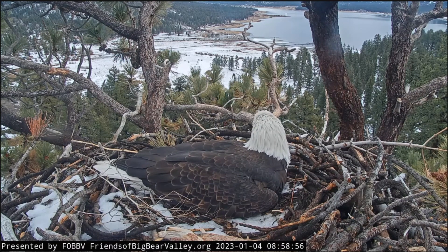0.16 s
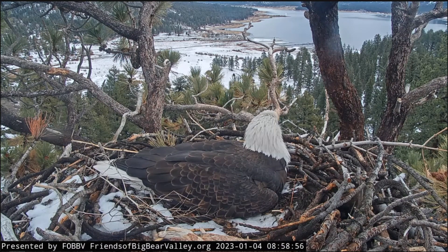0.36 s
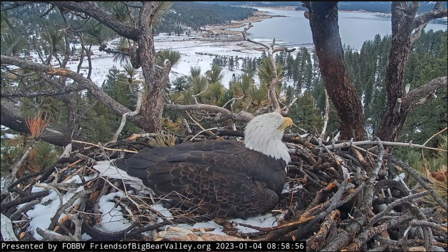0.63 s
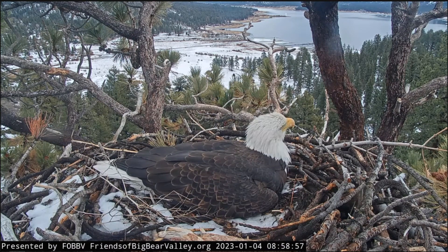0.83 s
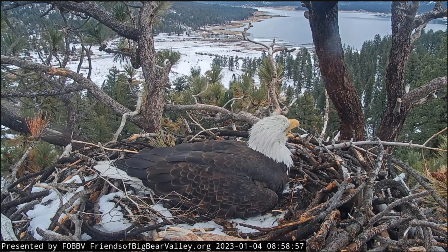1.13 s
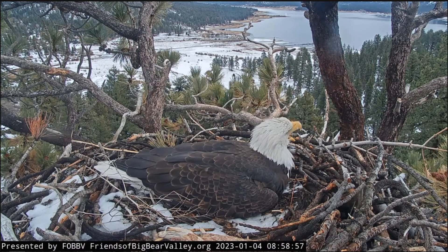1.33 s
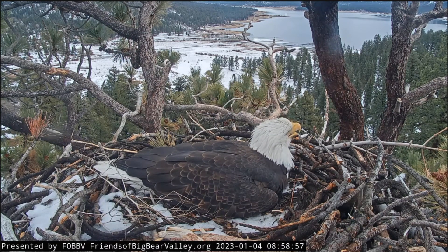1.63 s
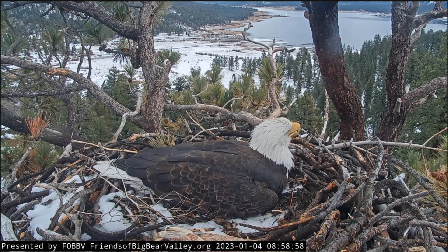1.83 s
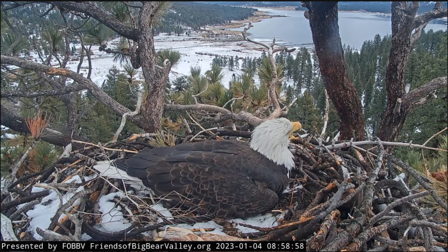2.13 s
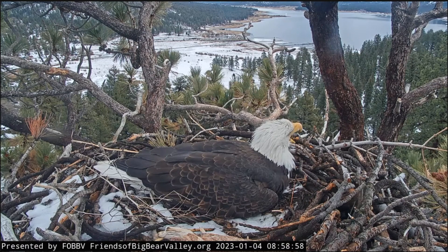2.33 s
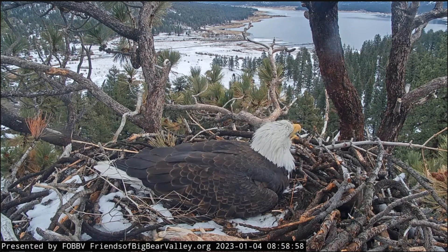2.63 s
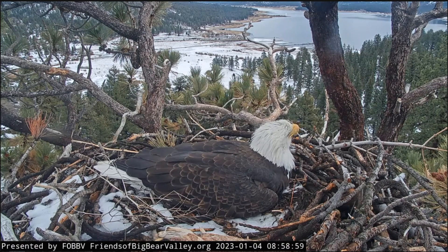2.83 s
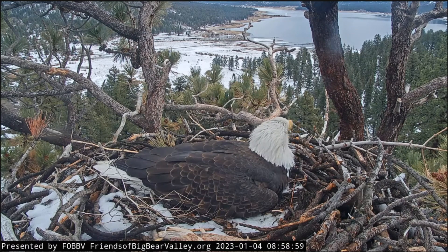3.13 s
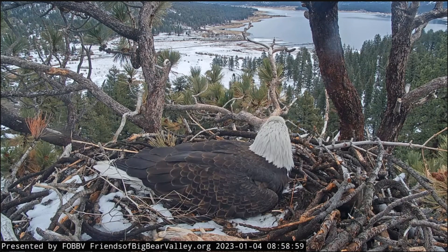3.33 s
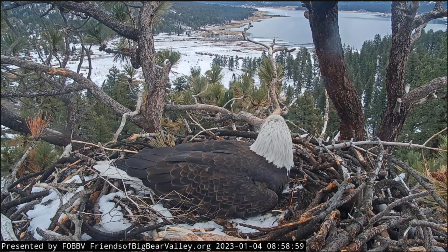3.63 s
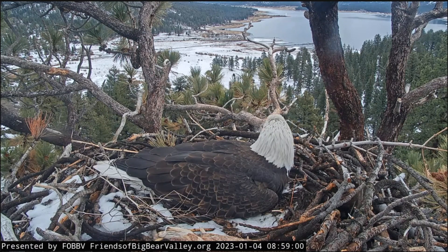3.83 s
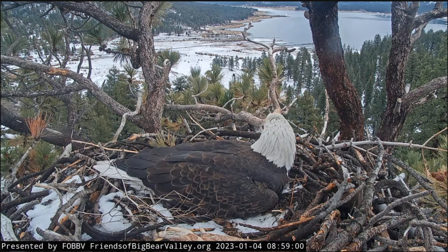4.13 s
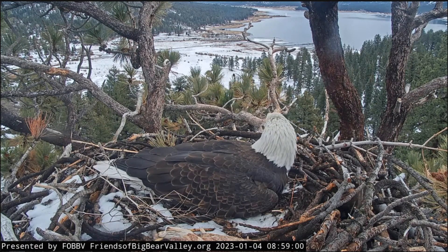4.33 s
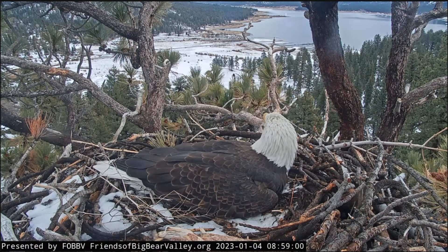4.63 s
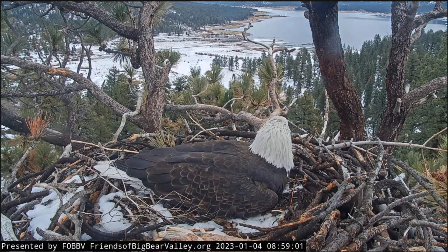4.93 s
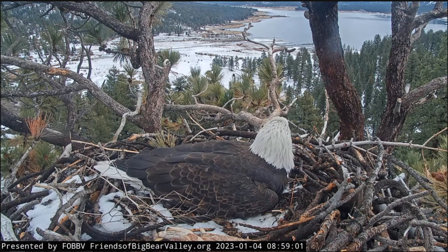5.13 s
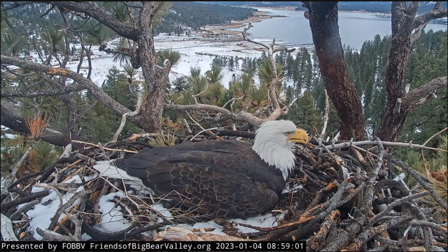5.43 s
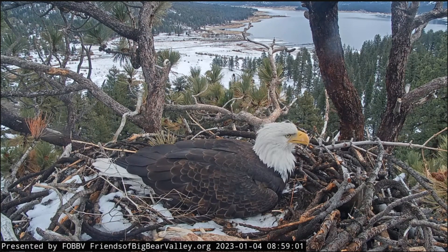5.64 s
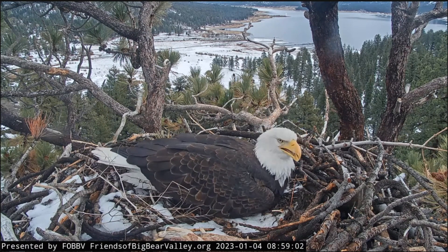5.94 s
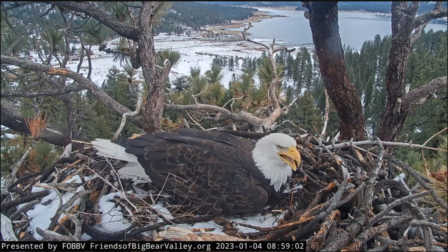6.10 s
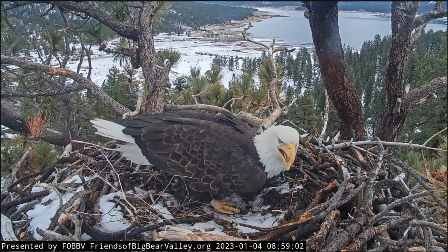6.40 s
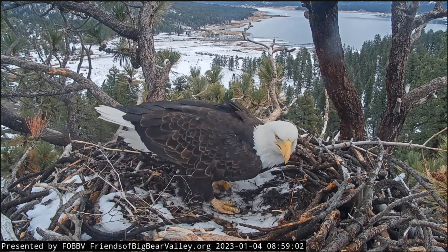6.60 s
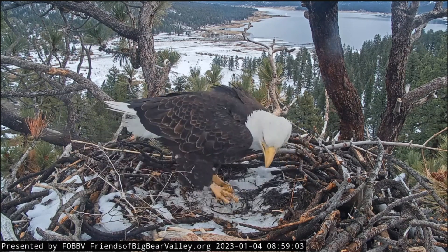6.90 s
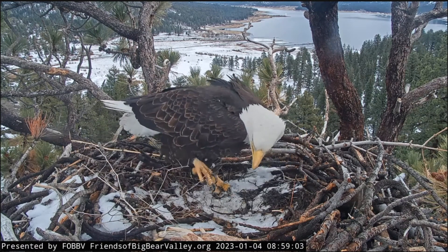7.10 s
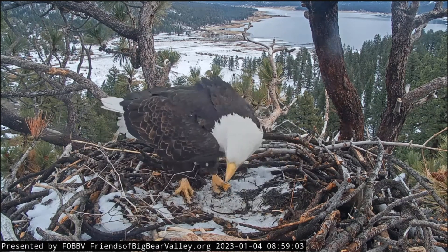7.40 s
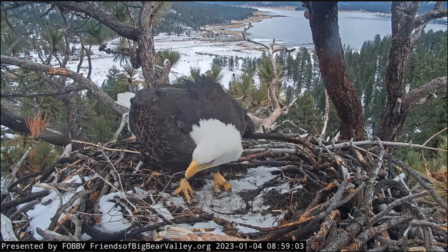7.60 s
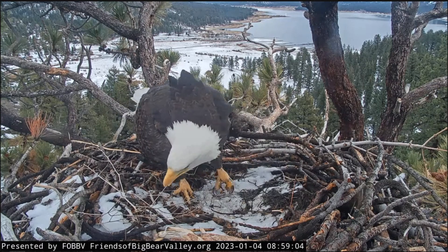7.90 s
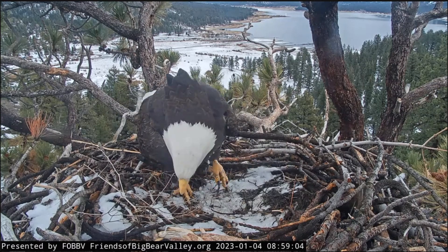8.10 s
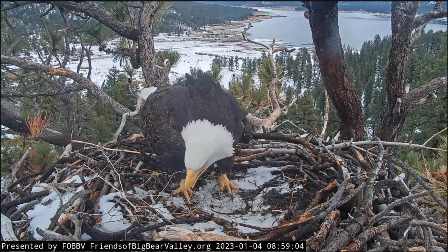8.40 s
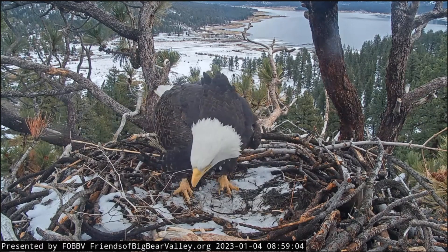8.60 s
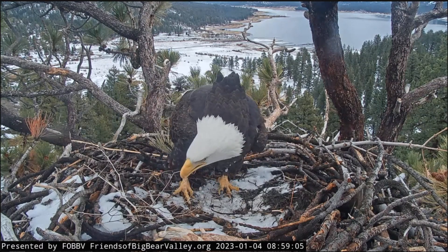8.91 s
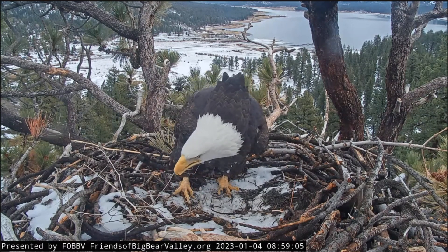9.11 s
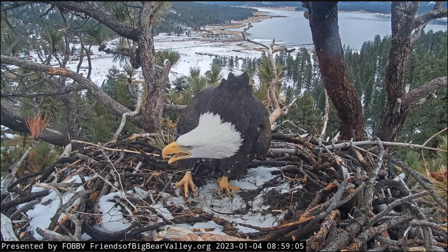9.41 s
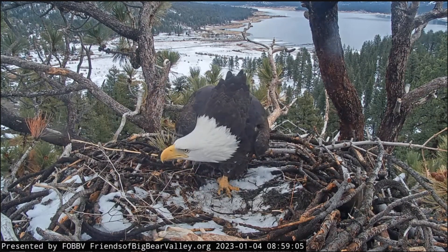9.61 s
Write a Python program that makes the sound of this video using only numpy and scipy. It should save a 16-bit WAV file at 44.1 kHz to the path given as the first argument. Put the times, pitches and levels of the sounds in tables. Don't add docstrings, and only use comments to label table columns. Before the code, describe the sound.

Quiet outdoor air, with a distant low wind hum in pines. At about 1.0 s a bald eagle close to the microphone gives a half-second squeal, starting low and breaking abruptly high. A brighter, piercing high call follows at 2.1-2.7 s, ending with a soft low thump and faint echoes from trunks and slopes. Wind remains, rumbling briefly near 2.6 s, with tiny dry twig ticks at 3.2, 3.6 and 4.6 s. At 4.75-5.3 s comes a weaker, hesitant, wavering call that strengthens; more ticks near 5.5 s. A strong high squeal rises at 5.9-6.6 s. A lower, rough, buzzing call runs 6.9-7.5 s, flicking high at its end; another low one lasts 7.9-8.5 s. Twigs tick at 8.95 s. The last call, 9.0-9.6 s, begins low and softer, with a sharp twig snap near 9.3 s, breaks high and fades into light echo and wind.

```python
import sys
import numpy as np
from scipy import signal
from scipy.fft import rfft, irfft, next_fast_len
from scipy.io import wavfile
from scipy.ndimage import uniform_filter1d, map_coordinates

SR = 44100
rng = np.random.default_rng(int(sys.argv[2]) if len(sys.argv) > 2 else 0)


def master(y):
    cut = np.clip(np.atleast_2d(y).T, -1, 1)
    pcm = np.round(cut * 32767)
    wavfile.write(sys.argv[1], SR, pcm.astype(np.int16))


def voltage_ratio(decibels):
    exponent = np.asarray(decibels, float) / 20
    return 10 ** exponent


N = 429975

# pitch_hz, level_db
THROAT = [(500, -20.5), (1100, -7), (1800, -6.5), (2400, -1), (3100, 1.5), (4200, -4.5), (5500, -9.5),
          (9000, -8.5), (15000, -42.5)]


def unit(x):
    return x / np.sqrt(np.mean(x ** 2) + 1e-20)


def along(points, hz):
    f, v = np.transpose(points)
    return np.interp(np.log(hz + 1), np.log(f + 1), v)


def wobble(rate, size=N):
    knots = rng.standard_normal(int(size * rate / SR) + 4)
    return map_coordinates(knots, [np.arange(size) * rate / SR])


def smooth(x, s):
    return uniform_filter1d(x, max(1, int(s * SR)))


def peak(hz, centre, half_width):
    return 1 / (1 + ((hz - centre) / half_width) ** 2)


def filtered(x, response):
    m = next_fast_len(N + SR // 2)
    return irfft(rfft(x, m) * response(np.fft.rfftfreq(m, 1 / SR)), m)[..., :N]


def coloured_noise(response):
    return unit(filtered(rng.standard_normal(N), response))


def echo_paths(hz, paths):
    return sum(voltage_ratio(db) * np.exp(-2j * np.pi * hz * s) for s, db in paths)


def blurred(x, length, t60, gap_s):
    t = np.arange(length) / SR
    tail = rng.standard_normal(length) * voltage_ratio(-60 * t / t60) * (t > gap_s)
    return signal.oaconvolve(x, tail / np.linalg.norm(tail))[:N]


def wind():
    # pitch_hz, level_db (per Hz)
    air = [(12, -51), (20, -4.5), (47, -5), (64, 4), (232, -16.5), (275, -20), (384, -23), (493, -22.5),
           (652, -25), (1460, -23), (2160, -26.5), (3300, -19.5), (3600, -17.5), (5400, -33), (5900, -37.5),
           (12900, -54), (15600, -78)]
    # time_s, level_db
    gusts = [(0.0, -47.5), (2.15, -46.5), (2.39, -42), (2.58, -36), (2.69, -47.5), (5.13, -46), (5.37, -46),
             (6.49, -45.5), (6.79, -44.5), (7.25, -45), (7.66, -44), (8.63, -45.5), (9.75, -45)]
    s, db = np.transpose(gusts)
    lift_db = lambda hz: 1.5 * peak(hz, 7600, 600) + 4 * peak(hz, 13500, 1200)
    noise = voltage_ratio(-39) * coloured_noise(lambda hz: voltage_ratio(along(air, hz) + lift_db(hz)))
    rumble = filtered(noise, lambda hz: 1 / (1 + (hz / 220) ** 4))
    swell = voltage_ratio(np.interp(np.arange(N) / SR, s, db - np.mean(db)) + wobble(3.6))
    breeze = voltage_ratio(.5 * wobble(1))
    return swell * rumble + breeze * (noise - rumble)


def twigs():
    # start_s, peak_db
    ticks = [
        (3.1875, -52),
        (3.6062, -51.5),
        (4.5692, -46),
        (4.7006, -53.5),
        (5.4462, -46),
        (5.6657, -48),
        (8.9533, -45),
        (9.2812, -36),
        (9.274, -41),
        (9.302, -46),
    ]
    x, t = np.zeros(N + 400), np.arange(400) / SR
    for s, db in ticks:
        x[round(s * SR):][:400] += voltage_ratio(db - 60 * t / 0.0072) * rng.standard_normal(400)
    return filtered(x[:N], lambda hz: np.clip(hz / 7000, 0, 1) ** 2 / (1 + (hz / 13500) ** 16))


def slope(x):
    # delay_s, level_db
    slopes = [
        (.335, -32),
        (.295, -36),
        (.2, -41),
    ]
    # time_s, level_db
    facing = [
        (1.3, -8),
        (2.4, 2.5),
        (5.2, -5),
        (6.3, 2),
        (7.4, -10),
        (8.3, 0),
    ]
    crown = filtered(blurred(x, SR // 2, t60=.45, gap_s=.01), lambda hz: 1 / (1 + ((hz - 1750) / 300) ** 4))
    turned = x * voltage_ratio(np.interp(np.arange(N) / SR, *np.transpose(facing)))
    far = filtered(turned, lambda hz: echo_paths(hz, slopes) * peak(hz, 3600, 800))
    return voltage_ratio(-27) * crown + far * voltage_ratio(3.5 * wobble(45))


def forest(x):
    # pitch_hz, decay_s
    decay = [(1000, .6), (3500, 1.1), (6000, .3)]
    hz, t, z = signal.stft(rng.standard_normal(SR), SR, nperseg=256)
    colour_db = -5 * np.abs(np.log2((hz + 1) / 3300))
    fade_db = -60 * t / along(decay, hz)[:, None]
    tail = signal.istft(z * voltage_ratio(colour_db[:, None] + fade_db), SR, nperseg=256)[1]
    late = np.clip(np.arange(len(tail)) / SR / .3, 0, 1) ** 1.5
    tail = tail * late * voltage_ratio(2.5 * wobble(32, size=len(tail)))
    x = x * (.6 + .9 * wobble(90))
    return signal.fftconvolve(x, tail / np.linalg.norm(tail))[:N]


def trunks(x):
    # delay_s, level_db
    paths = [
        (.011, -24),
        (.019, -27),
        (.031, -30),
    ]
    return filtered(x, lambda hz: echo_paths(hz, paths) * peak(hz, 3400, 900))


def nest(x):
    blur = blurred(x, SR // 10, t60=.095, gap_s=.004)
    return voltage_ratio(-32) * filtered(blur, lambda hz: 1 / (1 + (hz / 6000) ** 4))


def phrase(rows, from_jump, to_jump):
    first, last = np.array(rows[0]), np.array(rows[-1])
    jump, attack, release = (0.016, 9.5, -0.018), (.016, 17, 0.025), (.022, 22, .075)
    lead_s, lead_db, scoop = jump if from_jump else attack
    tail_s, tail_db, sag = jump if to_jump else release
    start = first - [lead_s, scoop * first[1], lead_db, 0, 10]
    end = last - [-tail_s, sag * last[1], tail_db, 0, 10 if to_jump else 7]
    return np.vstack([start, rows, end])


def phrases():
    # time_s, pitch_hz, level_db, beak_gape (0-1), pressure (dB per octave)
    first_low = [(1.018, 1057, -28.5, 0.44, -10.5), (1.036, 1071, -24.5, 0.52, 0.5),
                 (1.096, 1087, -19, 0.56, 5), (1.12, 1103, -21.5, 0.5, -0.5), (1.15, 1120, -18, 0.57, 4.5),
                 (1.21, 1142, -24, 0.58, -2.5)]
    first_high = [(1.232, 1633, -15, 0.67, -2), (1.26, 1638, -14, 0.64, 5),
                  (1.295, 1652, -16.5, 0.68, -5.5), (1.33, 1662, -13.5, 0.7, 3),
                  (1.44, 1695, -13, 0.73, 1.5), (1.458, 1663, -13, 0.65, 1)]
    second = [(2.142, 1670, -24.5, 0.6, -11.5), (2.172, 1691, -14.5, 0.74, -3),
              (2.184, 1650, -14.5, 0.67, -2.5), (2.308, 1711, -14, 0.77, -3.5),
              (2.363, 1727, -13, 0.73, 4.5), (2.506, 1757, -12, 0.72, 8), (2.591, 1781, -13.5, 0.82, -7),
              (2.633, 1816, -12.5, 0.82, -1.5), (2.652, 1681, -13, 0.65, -1.5)]
    third = [(4.759, 1510, -26, 0.67, -7), (4.786, 1554, -21.5, 0.65, -3.5),
             (4.876, 1579, -21.5, 0.69, 0.5), (4.917, 1604, -26.5, 0.56, 9), (4.959, 1608, -34, 0.35, 13),
             (5.019, 1637, -22.5, 0.6, 7.5), (5.099, 1645, -24.0, 0.54, 10), (5.307, 1702, -14, 0.57, 3),
             (5.322, 1649, -12.5, 0.69, 3.5)]
    fourth = [(5.888, 1587, -22.5, 0.78, -10.5), (5.91, 1600, -20, 0.75, -9.5),
              (5.934, 1523, -22, 0.69, -6.5), (6.041, 1604, -16, 0.883, -8), (6.15, 1636, -14.5, 0.71, -8),
              (6.294, 1683, -13.5, 0.78, -2), (6.463, 1704, -13, 0.79, -3), (6.536, 1733, -13.5, 0.77, 1),
              (6.557, 1639, -11.5, 0.74, -3.5)]
    fifth_low = [(6.946, 1105, -16, 0.66, -4.5), (6.966, 1149, -18, 0.66, -8.5),
                 (7.016, 1141, -19.0, 0.59, -3.5), (7.09, 1165, -15, 0.68, -3),
                 (7.168, 1189, -18.5, 0.79, -10), (7.3, 1213, -16.5, 0.672, -12),
                 (7.348, 1231, -14.5, 0.745, -7), (7.426, 1246, -16, 0.68, -7),
                 (7.462, 1263, -16, 0.61, -3.5)]
    fifth_high = [(7.48, 1782, -13.5, 0.77, 3), (7.506, 1784, -11.5, 0.72, 3.9), (7.523, 1715, -13, 0.7, 1)]
    sixth = [(7.936, 1149, -20.5, 0.6, -3), (7.966, 1190, -18.5, 0.67, -6), (8.002, 1167, -21, 0.64, -4),
             (8.285, 1261, -16, 0.65, -4.5), (8.35, 1271, -16.5, 0.54, -7), (8.392, 1277, -14.5, 0.56, -2),
             (8.44, 1252, -16, 0.64, -6), (8.5, 1264, -16.5, 0.6, -4.5), (8.523, 1173, -17, 0.61, -2)]
    last_low = [(8.985, 1143, -20, 0.56, -4.5), (9.086, 1108, -24, 0.5, -2.5),
                (9.18, 1130, -22.5, 0.58, -3), (9.268, 1154, -20.5, 0.58, -5), (9.334, 1151, -22, 0.54, -7),
                (9.37, 1160, -22, 0.61, -5.5), (9.408, 1189, -17, 0.67, 0), (9.424, 1185, -23.5, 0.73, -2)]
    last_high = [(9.436, 1733, -29.5, 0.63, -7), (9.452, 1697, -15.5, 0.57, -1),
                 (9.482, 1674, -18.5, 0.57, -5), (9.546, 1666, -15, 0.59, -5.5),
                 (9.568, 1608, -17, 0.64, -3.5), (9.589, 1539, -26, 0.52, -4)]
    calls = [first_low, first_high, second, third, fourth, fifth_low, fifth_high, sixth, last_low, last_high]
    jumps = [b[0][0] - a[-1][0] < .1 for a, b in zip(calls, calls[1:])]
    return [phrase(*each) for each in zip(calls, [False] + jumps, jumps + [False])]


def effort():
    # start_s, length_s, first_db, last_db (over the voice), mouth_resonance_hz
    slaps = [(1.142, 0.017, -19.5, -15.5, 8200), (1.226, 0.228, -10.5, -5, 9200),
             (2.162, 0.037, -8.5, -12, 8790), (2.212, .125, -8.5, -9.5, 8500), (2.342, .2, -3, -3, 10650),
             (2.536, .12, -4, -8.5, 8360), (5.225, .004, -21, -26, 9115), (5.237, 0.0085, -21, -10, 9400),
             (5.258, 0.011, -9, -19, 9700), (5.287, 0.03, -10.5, -7, 9270),
             (6.031, 0.0235, -28, -24.5, 6970), (6.064, 0.025, -23, -18, 6400),
             (6.096, 0.0086, -24.5, -28.5, 6500), (6.141, .12, -11.5, -5, 7300),
             (6.26, 0.296, -2, -3.5, 8640), (6.944, .21, -14, -14, 6700), (7.159, 0.102, -20.5, -20, 7530),
             (7.29, 0.014, -19.5, -28.5, 6900), (7.308, 0.122, -11, -13, 6540),
             (7.463, 0.059, -3, -6, 10300), (8.161, 0.027, -22, -28, 7630), (8.196, 0.024, -19, -23, 7000),
             (8.232, .06, -20.5, -7, 7500), (8.292, 0.2125, -7.5, -5.5, 6730),
             (8.513, .003, -24, -26, 9000), (9.456, .105, -9.5, -14.5, 7610)]
    # centre_s, half_length_s, level_db, beat (share of pitch), roughness (0-1)
    slips = [(1.013, 0.013, -32.5, .5, 0.4), (1.223, 0.011, -26, .34, 0), (2.146, 0.018, -20, .335, 0.2),
             (5.247, 0.038, -50, .335, 1.1), (5.879, 0.029, -26, .335, 0.26), (6.943, 0.008, -31, .5, 0.59),
             (7.192, 0.0084, -30.5, .5, 0.42), (7.212, .007, -28.5, .5, 0.42), (7.237, .03, -39.5, .5, 1),
             (7.285, 0.0058, -27, .5, 0.22), (7.3, 0.011, -35, .5, 0.5), (7.343, .03, -38.5, .5, 0.9),
             (7.424, .02, -41, .5, .8), (7.457, 0.011, -28, .5, 0.4), (7.474, 0.011, -18.5, .335, 0.4),
             (7.54, .007, -23.5, .33, 0.5), (7.93, 0.011, -46, .5, 0.2), (8.0, 0.046, -48.5, .5, 1),
             (8.089, 0.034, -40.5, .5, 1), (8.139, .015, -40.5, .5, 1), (8.163, .006, -38, .5, .8),
             (8.22, 0.046, -42.5, .5, .9), (8.291, .008, -36, .5, 0.3), (8.33, .03, -43.5, .5, 0.3),
             (8.45, .025, -39.5, .5, .4), (8.491, .009, -28.5, .5, 0.2), (8.983, 0.0056, -30.5, .5, 0.35),
             (9.298, 0.048, -41.5, 0.67, 1), (9.433, 0.014, -38.5, .33, 0.3),
             (9.496, 0.047, -22.5, .305, 0.11), (9.598, .008, -33.5, .33, 0.1)]
    t = np.arange(0, N, 16) / SR
    rows = np.vstack(phrases())
    rows = rows[np.argsort(rows[:, 0])]
    start, length, first_db, last_db, hz = np.transpose(slaps)[:, :, None]
    inside = np.clip(t - start, 0, length)
    fade_db = 3997.5 * np.abs(t - start - inside)
    slaps_db = first_db + (last_db - first_db) * inside / length - fade_db
    barely_touching_db = -36.5
    db = np.interp(t, rows[:, 0], rows[:, 2]) + np.maximum(slaps_db.max(axis=0), barely_touching_db)
    mid, half, level, share, rough = np.transpose(slips)
    away = np.abs(t - mid[:, None]) / half[:, None]
    slip, near = voltage_ratio(level) @ np.exp(-away ** 2), away.argmin(axis=0)
    coarse = db, hz[slaps_db.argmax(axis=0), 0], slip, share[near], np.clip(rough[near], 0, 1)
    db, mouth_hz, *rest = [np.interp(np.arange(N) / SR, t, c) for c in coarse]
    return voltage_ratio(smooth(db, .002)), smooth(mouth_hz, 0.01), *rest


def through_beak(hz, level_db, gape, pressure):
    k = np.arange(1, 4)[:, None]
    u = k * hz / (1000 * 2 ** (2.6 * gape))
    db = pressure * np.log2(k) - 10 * np.log10((1 - u * u) ** 2 + (u / 6) ** 2)
    return list(level_db + db - 10 * np.log10(np.sum(voltage_ratio(db) ** 2, axis=0)))


def pockets_db(t, hz):
    # centre_s, half_length_s, pitch_hz, level_db (below 0
    pockets = [(1.12, 0.033, 5020, -25), (1.241, 0.033, 4900, -5.5), (1.332, 0.049, 6650, -4.5),
               (1.301, .1, 11600, -4), (1.273, .04, 13400, -10), (2.23, .03, 11700, -5.5),
               (2.27, .03, 6770, 4), (2.39, 0.056, 6900, -9), (2.46, 0.043, 8750, -11),
               (2.46, 0.057, 1750, -5), (2.49, 0.097, 5270, -6), (2.54, 0.018, 12400, -10),
               (2.581, .025, 7100, -3.5), (2.61, 0.035, 10820, -8.5), (2.643, 0.0035, 1750, -16.5),
               (4.817, 0.018, 4700, -9), (4.85, .05, 9450, -10), (5.1, 0.13, 13000, 13),
               (5.03, 0.072, 6550, 9.5), (5.93, .05, 9180, -14), (6.03, 0.038, 3130, -8.5),
               (6.127, 0.031, 3250, -8.5), (6.118, 0.021, 6400, 13), (6.33, 0.05, 6710, -12.5),
               (6.33, 0.1, 10120, -13), (6.438, 0.035, 6760, -6), (6.44, .02, 10250, -8),
               (6.389, 0.18, 11870, 9), (6.553, 0.0033, 1650, -13.5), (7.052, 0.053, 8050, 6.5),
               (7.279, 0.097, 2440, -5), (7.319, 0.028, 7340, -10), (7.32, .025, 9800, -8),
               (7.379, .04, 7420, 4.5), (7.993, 0.024, 4670, 2), (8.156, 0.12, 4900, 8),
               (8.0, 0.051, 10600, -17), (8.194, 0.06, 7400, -10), (8.319, 0.033, 5100, -18),
               (8.381, 0.047, 5090, -11), (8.374, 0.09, 10200, -21), (8.393, 0.048, 8900, -11),
               (9.13, .025, 6660, -4), (9.281, 0.036, 4620, -19), (9.36, 0.021, 4620, -22),
               (9.496, .025, 10000, -14), (9.5, .03, 13400, -16), (9.493, 0.016, 8310, -2),
               (2.641, .006, 10620, 17), (2.66, .004, 8550, -10), (4.762, .003, 4500, -10),
                (4.773, .003, 4530, -10), (4.8, .003, 4720, -13), (4.812, .005, 4800, 15),
                (4.833, 0.0052, 4720, -17), (4.854, .012, 4740, 6.5), (4.963, .003, 4830, -13),
                (5.26, 0.0027, 5090, -17), (5.919, 0.0024, 1570, -3.5), (6.554, .003, 6600, -16),
                (6.543, 0.0059, 1700, 7.5), (8.516, .005, 3650, 6), (8.527, 0.009, 1172, -7),
                (8.533, 0.0064, 2300, 4.5), (1.46, 0.0072, 1640, -3.5), (5.34, 0.0073, 1570, 3.5),
                (7.52, 0.0045, 1720, 11), (9.57, .015, 4800, -12), (7.52, .008, 5140, 4),
                (1.455, .006, 6700, -7.5), (2.441, .03, 5240, -2), (5.228, 0.0028, 5050, -12),
                (5.246, .003, 4970, -9), (5.264, .004, 5070, -7), (5.4, 0.0018, 3200, 8),
                (1.47, .006, 4800, 10), (8.513, 0.0033, 4880, 13), (8.526, 0.0061, 4700, 8.5),
                (8.527, .004, 3520, -13), (6.5, .009, 2440, -13), (7.45, .018, 5040, 12.5),
                (7.28, .012, 4850, -13), (9.2, .014, 6050, -12), (8.06, 0.028, 4750, 9.5),
                (9.155, .03, 4500, -9.5), (9.23, .02, 3300, -11), (7.168, .013, 5950, -13),
                (5.929, .002, 4620, -13.5), (9.305, 0.027, 6000, -13)]
    half_hz = 450
    return sum(db * np.exp(-((t - s) / half) ** 2 - ((hz - centre) / half_hz) ** 2)
               for s, half, centre, db in pockets if t[0] < s < t[-1])


def air_flow(t, falling):
    # centre_s, half_length_s, depth (0-1)
    catches = [(1.467, 0.0015, 0.8), (2.18, 0.0033, 0.67), (2.207, 0.0063, 0.4), (2.602, 0.0045, 0.62),
               (2.634, 0.0026, 0.4), (5.313, 0.0031, 0.95), (5.324, 0.0018, 0.56), (5.327, 0.002, 0.9),
               (5.335, .0015, .7), (6.545, 0.0035, 0.58), (6.56, 0.0015, 0.6), (7.521, .002, 0.72),
               (2.66, .001, .85), (2.669, .001, .7), (7.288, 0.0098, 0.5), (6.571, .001, .8)]
    flow = 1 - sum(np.clip(depth, 0, .9) * np.exp(-((t - mid) / half) ** 2) for mid, half, depth in catches)
    dying = np.clip(1 - (t[-1] - t) / .024, 0, .5) * 2 * falling
    return flow * (1 - .35 * dying * np.clip(.5 + wobble(260, size=len(t)), 0, 1))


def low_partials(t, hz, turn, dbs):
    falter = .65 + .5 * np.clip(1 - (t[-1] - t) / .07, 0, 1)
    out = 0
    for k, db in enumerate(dbs, 1):
        shaky_db = falter * np.sqrt(k) * wobble(68.58, size=len(t))
        out = out + voltage_ratio(db + pockets_db(t, k * hz) + shaky_db) * np.sin(k * turn + 0.91 * k * k)
    return out


def dull_db(hz, knee_hz, weak):
    return -26 * weak * np.log2(np.clip(hz / knee_hz, 1, None))


def soft_overtones(f, dbs, drift):
    body_db = 10 * np.log10(sum(voltage_ratio(db) ** 2 for db in dbs))
    hollow_db = 9 * peak(f, 4550, 350)
    return voltage_ratio(body_db - 15.5 - 64 * np.log2(f / 4700) + 2.0 * drift - hollow_db)


def slapped_overtones(f, flow, buzz, mouth_hz, weak, drift):
    # pitch_hz, level_db
    slap_colour = [(4000, -14), (5500, 6), (6800, 2), (8500, 4), (10300, 3.5), (12000, -4.5), (13800, -8),
                   (16000, -36.5)]
    mouth_db = 7 * peak(f, mouth_hz, 900)
    slap = voltage_ratio(along(slap_colour, f) + dull_db(f, 5400, weak) + 2.1 * drift + mouth_db)
    treble = np.sqrt(np.sum((slap * (f > 7300)) ** 2, axis=0))
    return slap * (buzz * flow * voltage_ratio(0.9 * wobble(45.04, size=len(buzz))) / treble)


def folded_lines(t, f, orders, turn, buzz, drift):
    fall_db = 54.924 * np.log2(np.clip(f / 19000, 1, None))
    gain = (f > 16300) * voltage_ratio(3 * drift - 3 - fall_db) * buzz ** 3
    return np.sum(gain * np.sin(2 * np.pi * 32000 * t - orders * turn), axis=0)


def side_lines(hz, turn, slip, part, rough, weak, high):
    beat = 2 * np.pi * np.cumsum(part * hz) / SR
    pairs = [(k, side) for k in range(10) for side in (-1, 1) if k + side >= 0 and (k, side) != (0, -1)]
    k, side = np.transpose(pairs)[:, :, None]
    shake = rough * np.array([wobble(210, size=len(hz)) for _ in k])
    gain = voltage_ratio(along(THROAT, (k + side * part) * hz) + dull_db(k * hz, 4037, weak) + 3.5 * shake)
    lines = np.sum(gain * np.sin(k * turn + side * beat + 2.9 * shake + k * k), axis=0) / 2
    steady = high * np.clip(1 - rough / .15, 0, 1)
    slow = voltage_ratio(-14.5) * np.sin(beat) + voltage_ratio(-19) * np.sin(turn - 2 * beat)
    return slip * (lines + steady * slow)


def note(rows, *strains):
    s, pitch, *controls = np.transpose(rows)
    a, b = int((s[0] - .001) * SR), int((s[-1] + .008) * SR)
    buzz, mouth_hz, slip, share, rough = [strain[a:b] for strain in strains]
    t = np.arange(a, b) / SR
    edge = np.clip(np.minimum((t - t[0]) / .004, (t[-1] - t) / .016), 0, 1) ** 2
    hz = smooth(np.interp(t, s, pitch), .012) * (1 + .0008 * wobble(60, size=b - a))
    turn = 2 * np.pi * np.cumsum(hz) / SR
    dbs = through_beak(hz, *[smooth(np.interp(t, s, v), 0.0037) for v in controls])
    flow = air_flow(t, falling=pitch[-1] < pitch[-2])
    dbs[1:] = [db + 20 * np.log10(flow) for db in dbs[1:]]
    out = low_partials(t, hz, turn, dbs)

    orders = np.arange(4, 15)[:, None]
    f = orders * hz
    drift = np.array([wobble(26.1, size=b - a) for _ in orders])
    weak = np.clip((voltage_ratio(-51) / buzz) ** .8 - .3, 0, 1)
    gain = soft_overtones(f, dbs, drift) + slapped_overtones(f, flow, buzz, mouth_hz, weak, drift)
    gain = gain * voltage_ratio(pockets_db(t, f)) * (f < 15600)
    out += np.sum(gain * np.sin(orders * turn + 0.54 * drift + 1.9 * orders), axis=0)
    out += folded_lines(t, f, orders, turn, buzz, drift)

    high = np.mean(pitch) > 1400
    out += side_lines(hz, turn, slip, share if high else .5, rough, weak, high)
    return a, np.sqrt(2) * edge * out


def lead_ins():
    # start_s, length_s, level_db
    stubs = [
        (2.098, 0.034, -42.5),
        (5.842, 0.043, -35.5),
        (6.912, 0.0247, -40.5),
        (8.954, 0.022, -42),
    ]
    out, t = np.zeros(N), np.arange(N) / SR
    for s, length, db in stubs:
        u = np.clip((t - s) / length, 0, 1)
        turn = 2 * np.pi * length * u * (440 + 55 * u)
        overtones = 2.3 * u ** 2 * (np.sin(2 * turn) + np.sin(3 * turn))
        out += voltage_ratio(db) * np.sin(np.pi * u) * (np.sin(turn) + overtones)
    return out


def breathing(sounding, buzz, slip, rough):
    # pitch_hz, level_db
    hiss_colour = [(500, -8), (3000, -1.5), (6000, -1.5), (9000, 1), (13000, 1), (15500, -20.5)]
    hiss = coloured_noise(lambda hz: voltage_ratio(along(hiss_colour, hz)))
    rasp = coloured_noise(lambda hz: voltage_ratio(along(THROAT, hz) + 8 * peak(hz, 3150, 500)))
    rasp = unit(rasp * voltage_ratio(4 * wobble(520)))
    push = buzz ** .45 * np.clip(buzz / voltage_ratio(-51.0), 0, 1) ** 2
    hiss = voltage_ratio(-30.5 + 0.67 * wobble(40)) * push * hiss
    return sounding * (hiss + voltage_ratio(-6) * (rough + 0.17) * slip * rasp)


def eagle():
    buzz, mouth_hz, slip, share, rough = effort()
    voice = np.zeros(N)
    for rows in phrases():
        a, x = note(rows, buzz, mouth_hz, slip, share, rough)
        voice[a:a + len(x)] += x
    sounding = np.clip(smooth(np.abs(voice), 0.0043) / voltage_ratio(-46.5), 0, 1)
    return voice + lead_ins(), breathing(sounding, buzz, slip, rough)


def scene():
    bird, breath = eagle()
    ringing = filtered(bird, lambda hz: (hz > 3000) * (hz < 4000))
    loud = smooth(ringing ** 2, .08) / voltage_ratio(-14) ** 2
    echo = voltage_ratio(-48) * forest(bird) + trunks(bird) + nest(bird)
    hiss = filtered(breath, lambda hz: hz > 5500)
    background = (breath - hiss + wind() + twigs()) / (1 + np.abs(loud) ** 3)
    return (bird + echo + hiss + background + slope(bird))[None]


def roll_off(x):
    return signal.sosfilt(signal.butter(12, 15780, fs=SR, output="sos"), x)


def record(dry):
    # time_s, level_db
    thumps = [
        (1.46, -33.5),
        (2.632, -27),
        (6.56, -32.5),
        (7.5, -33.5),
    ]
    t = np.arange(N) / SR
    thump = sum(voltage_ratio(db) * np.exp(-((t - s) / 0.03) ** 2) * np.sin(2 * np.pi * 38 * (t - s)) for s, db in thumps)
    rounded = dry / (1 + np.abs(dry / .75) ** 6) ** (1 / 6)
    return roll_off(rounded + thump)


dry = scene()
out = record(dry)
master(out)
```